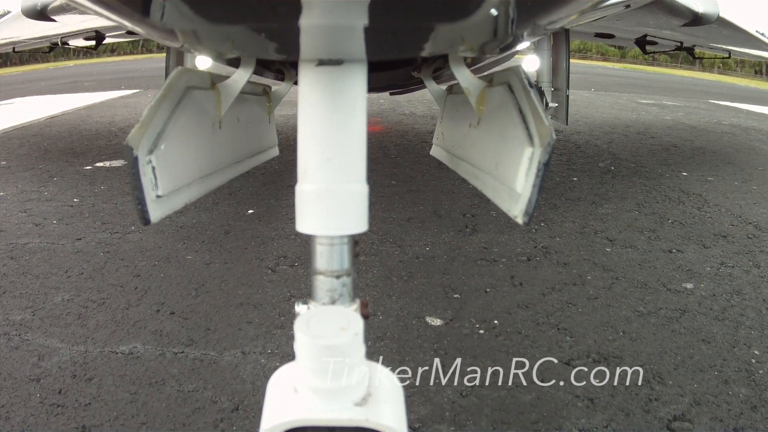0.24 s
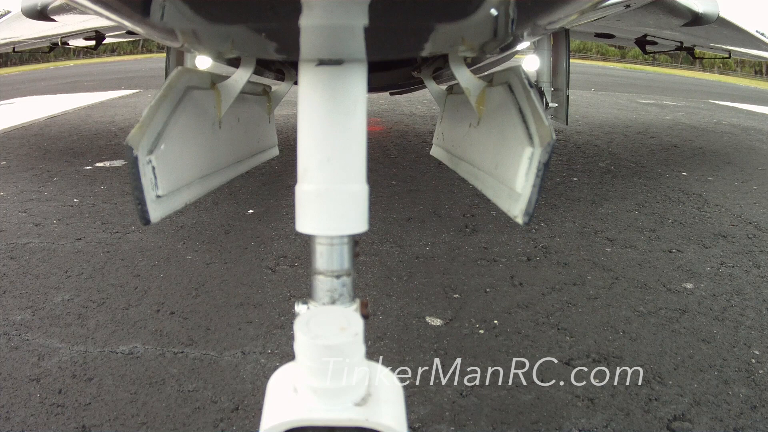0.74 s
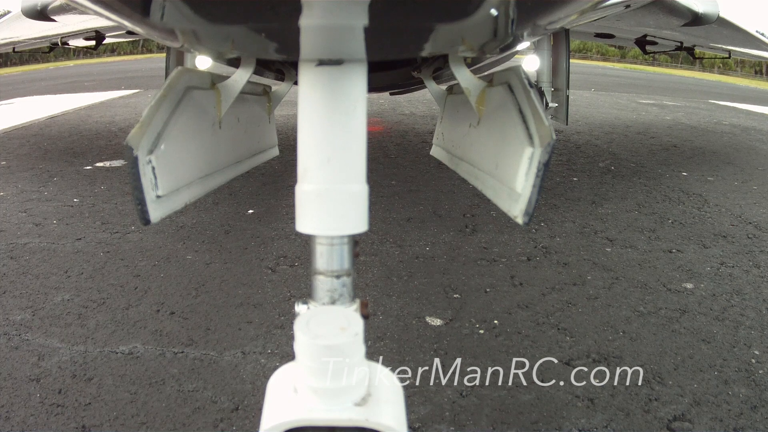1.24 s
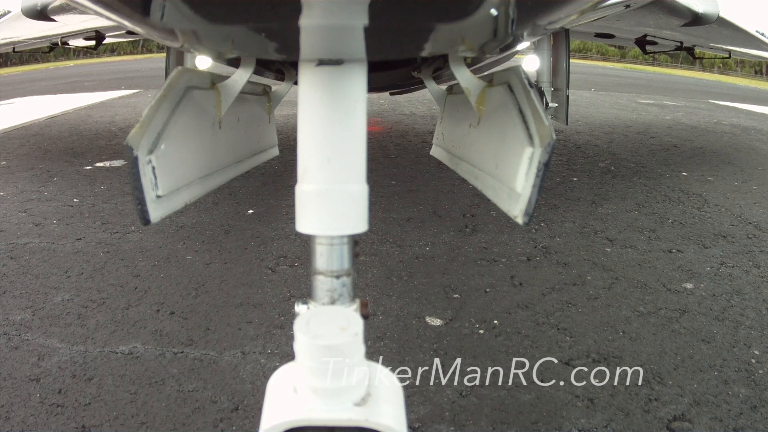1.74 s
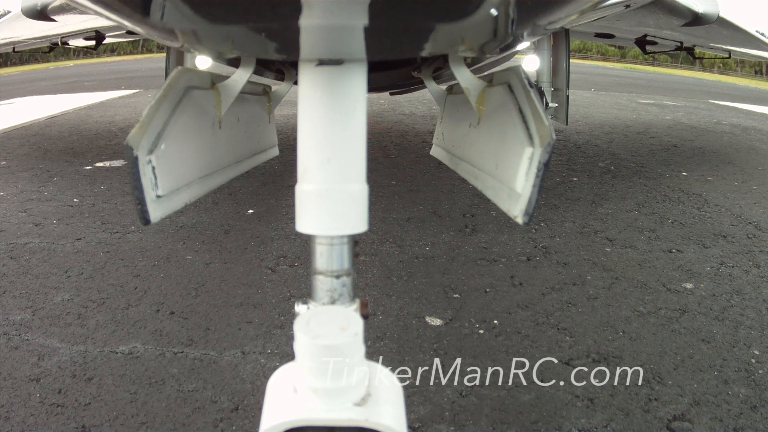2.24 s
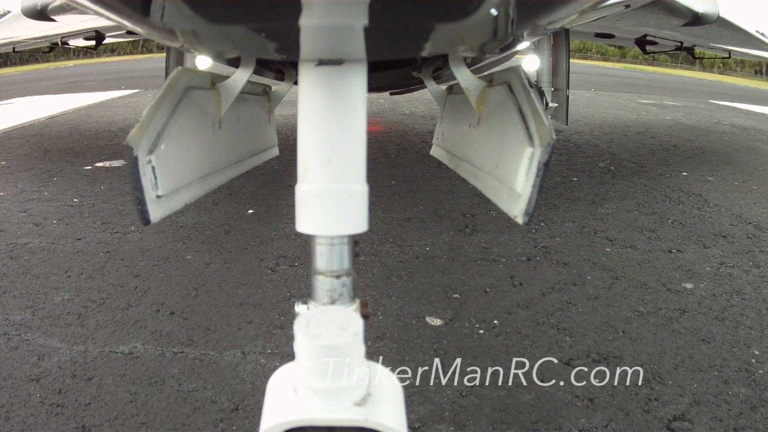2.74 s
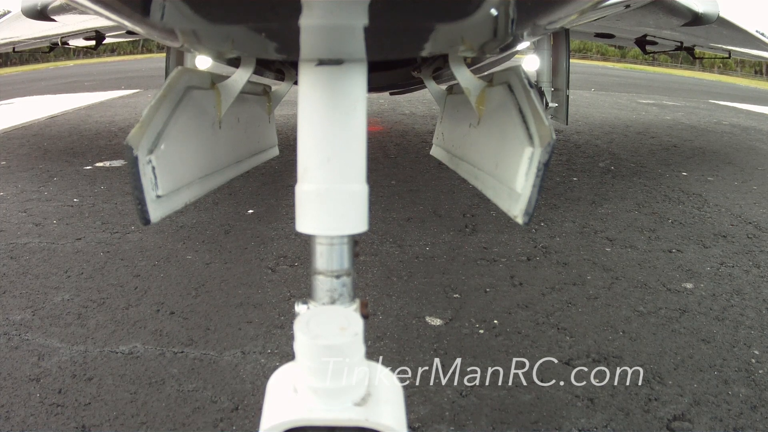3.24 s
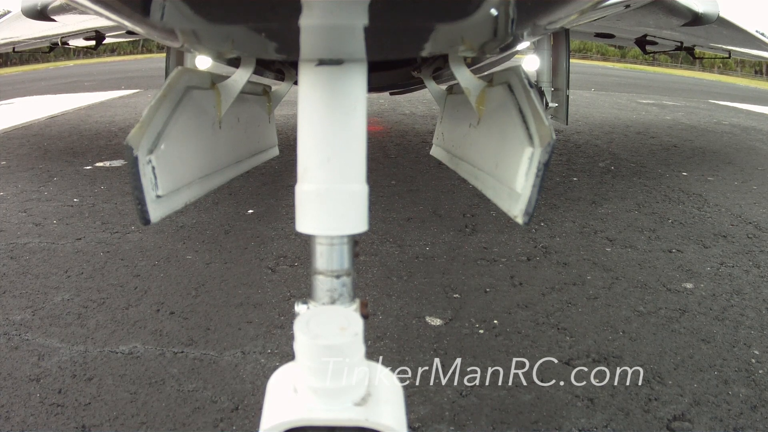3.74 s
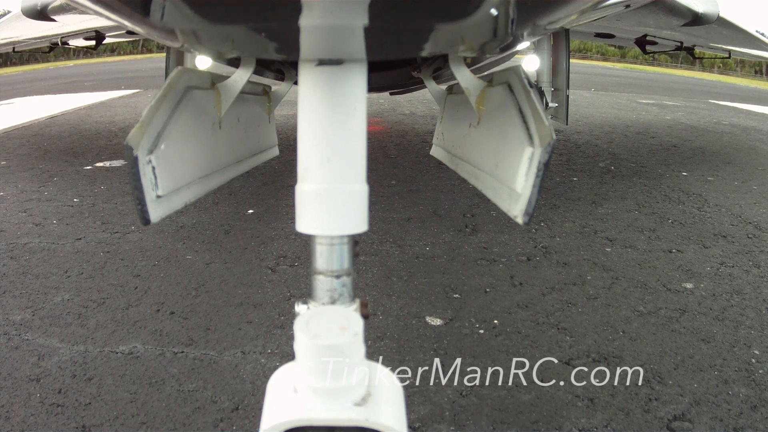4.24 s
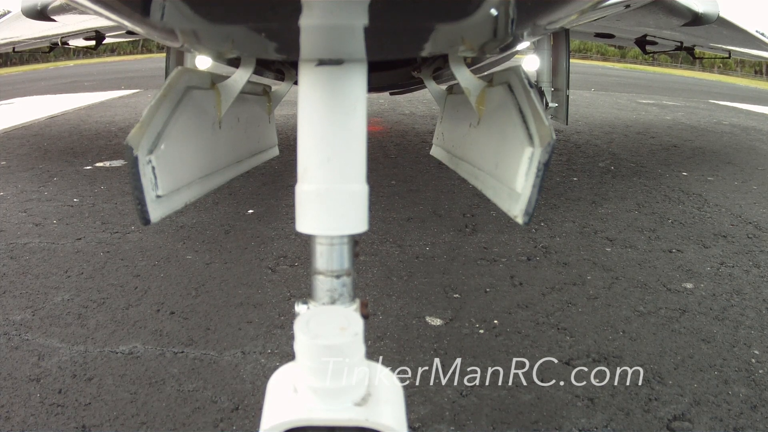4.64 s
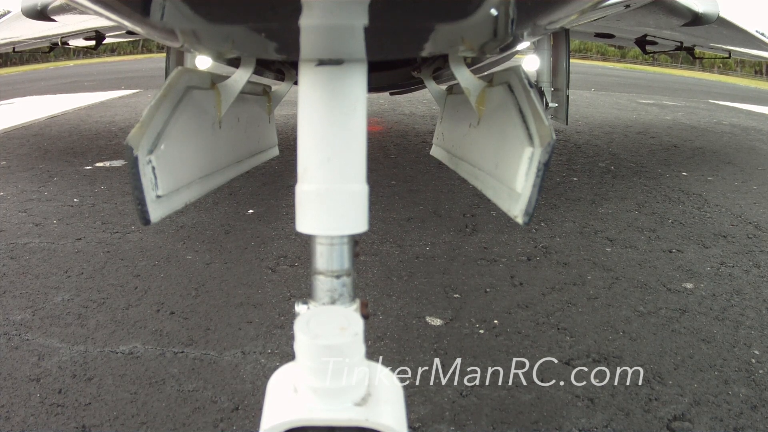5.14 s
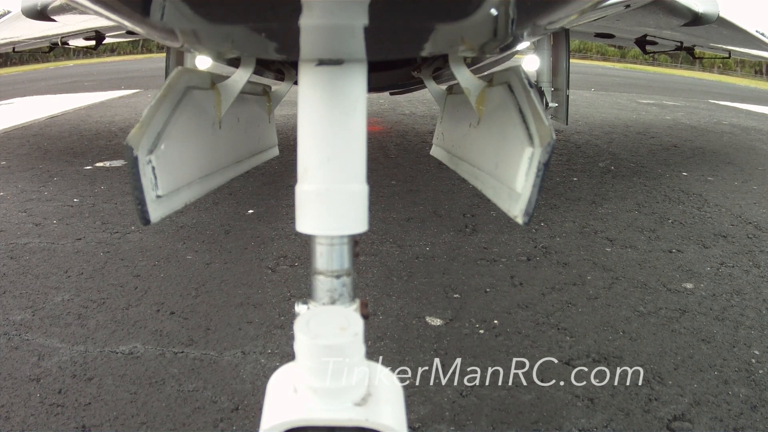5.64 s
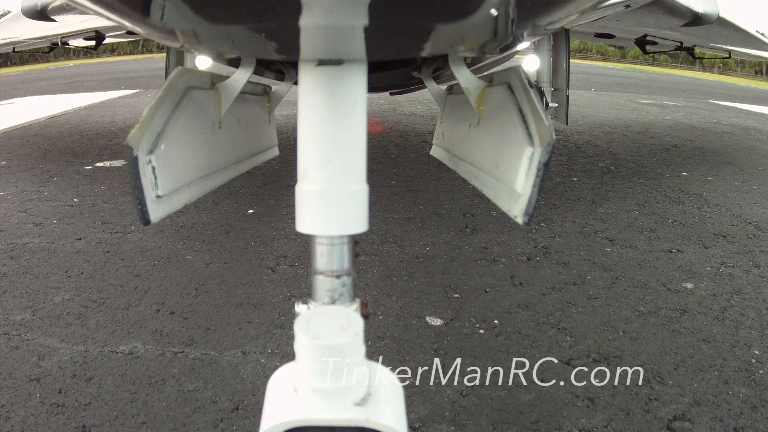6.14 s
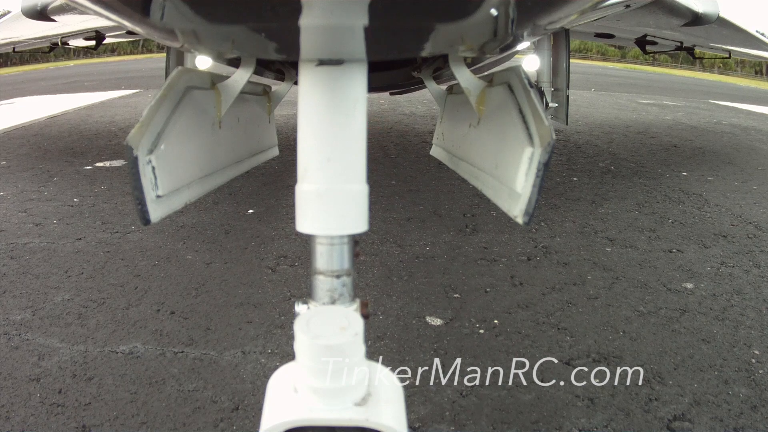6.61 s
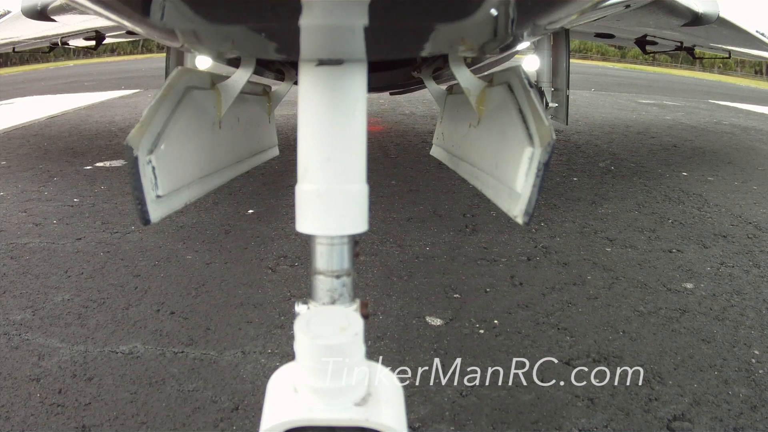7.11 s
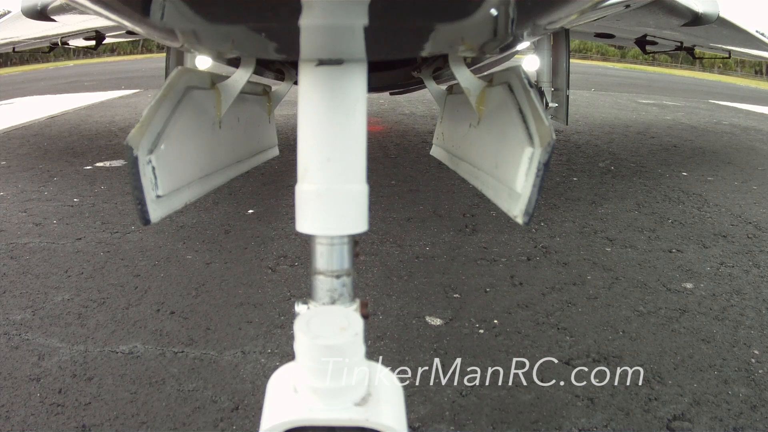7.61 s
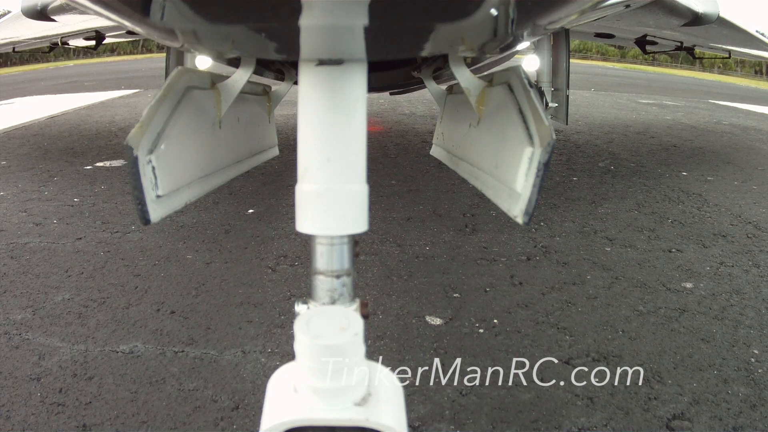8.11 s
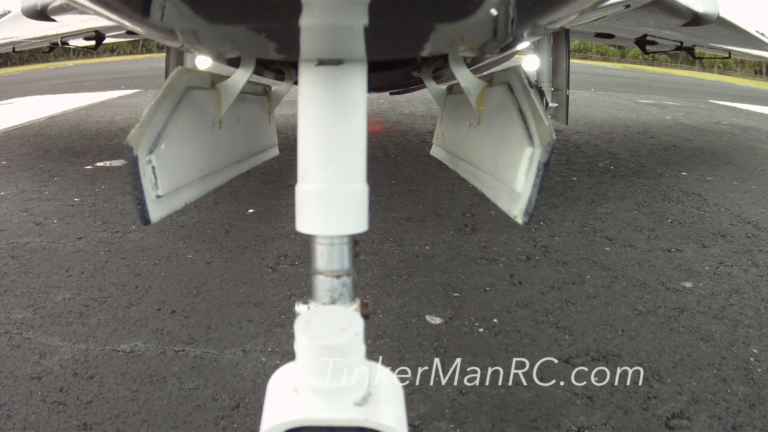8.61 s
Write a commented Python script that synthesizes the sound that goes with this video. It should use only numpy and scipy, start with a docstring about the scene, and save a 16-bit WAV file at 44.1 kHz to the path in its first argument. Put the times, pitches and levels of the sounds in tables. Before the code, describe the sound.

A small jet turbine idles on an outdoor runway, heard from right beneath the belly. A dense, steady rush of exhaust and hiss carries a thin high whine that slowly wavers in pitch. Around seven seconds it begins to spool up: the whine climbs smoothly and grows piercing, with brief chirps, while the broad rush thins out. It ends still rising. Mono, close, dry.

```python
"""Model jet idling, then spooling up

A model jet idles on the runway, heard by a small camera under its belly, and spools up from about 7 s.
The exhaust is noise rushing through fixed resonances of the airframe and the gap above the tarmac.
The compressor whines on multiples of the shaft speed, which hunts slowly at idle and then climbs.
Single overtones flare as brief chirps; the ultrasonic ones fold down in the camera's converter."""
import sys
import numpy as np
from scipy import signal
from scipy.fft import rfft, irfft, next_fast_len
from scipy.io import wavfile
from scipy.ndimage import uniform_filter1d

SR = 44100
rng = np.random.default_rng(int(sys.argv[2]) if len(sys.argv) > 2 else 0)


def put_to_file(sound):
    """Save the sound as 16-bit audio at rate SR, in the file named by the first command-line argument."""
    columns = np.atleast_2d(sound).T  # one column per channel
    safe = np.clip(columns, -1, 1)
    whole_steps = np.round(safe * 32767)
    wavfile.write(sys.argv[1], SR, whole_steps.astype(np.int16))


N = 391166
TIME = np.arange(N) / SR  # s


def gain_of(db):
    """Decibels to amplitude."""
    return 10 ** (np.asarray(db) / 20)


def read(points, hz):
    """A spectrum of rows (Hz, value), joined on a log-frequency axis."""
    f, value = np.transpose(points)
    return np.interp(np.log(hz + 1), np.log(f + 1), value)


def bell(x, centre, width):
    """A smooth hump of height 1; at one width from the centre it has dropped to 1/e."""
    return np.exp(-((x - centre) / width) ** 2)


def humps(rows, hz):
    """The dB curve of a table of resonances and cancellations."""
    return sum(db * bell(hz, centre, width) for centre, width, db in rows)


def drift(rate_hz):
    """Random motion of rms 1: noise whose spectrum fades out above about rate_hz."""
    size = 2 ** 19
    spectrum = rfft(rng.standard_normal(size))
    x = irfft(spectrum * bell(np.fft.rfftfreq(size, 1 / SR), 0, rate_hz))[:N]
    return x / x.std()


# At idle the governor hunts round its set speed and slowly settles (speeds in turns per second).
IDLE_SPEED, HUNT_SPEED = 775.7, 6.7
HUNT_PERIOD_S, HUNT_CREST_S, HUNT_SETTLE_S = 3.307, 2.02, 11.2
# The spool-up of the shaft, before inertia rounds it.
# Each row: time in seconds, shaft speed in turns per second.
SPOOL_UP_SPEEDS = [(6.85, 771.0), (7.02, 774.0), (7.235, 787.8), (7.497, 819.3), (7.782, 864.1),
                   (8.194, 937.8), (8.345, 962.1), (8.657, 1005.9), (8.87, 1029.1)]


def shaft_speed():
    """The shaft hunts at idle, then climbs; the rotor's inertia rounds every change of speed."""
    settling = np.exp(-TIME / HUNT_SETTLE_S)
    hunt = HUNT_SPEED * settling * np.cos(2 * np.pi * (TIME - HUNT_CREST_S) / HUNT_PERIOD_S)
    start_s, climb_speed = np.transpose(SPOOL_UP_SPEEDS)
    climb = np.interp(TIME, start_s, climb_speed)
    speed = np.where(TIME < start_s[0], IDLE_SPEED + hunt, climb)
    return uniform_filter1d(speed, size=5000, mode="nearest")  # running mean over 0.11 s


# The basic colour of the rush, before resonances and band trims.
# Each row: frequency in Hz, density in dB per Hz.
RUSH_COLOUR = [(25, -96.7), (80, -84), (120, -71.5), (300, -66), (430, -56), (750, -56.5), (1400, -66),
               (2300, -64.5), (4000, -68.5), (5400, -63), (7900, -79.5), (10700, -84.5), (11600, -70.5),
               (15000, -68.5)]
# Resonances (+) and cancellations (-) under the fuselage, always present.
# Each row: centre in Hz, half width in Hz, height in dB.
BODY_RESONANCES = [(118, 7.5, -2), (137, 7.8, 6), (159, 6.4, -5.5), (168, 6.2, 5.5), (204, 20, -5),
                   (236.5, 10.4, 5), (263, 10.5, -2.5), (448, 56, 6), (583, 61, 3.5), (636, 12, -3.5),
                   (780, 16, 3), (883, 56, -7), (1052, 87, 6), (1140, 18, -9), (1190, 27, 2.5),
                   (1377, 80, -3.5), (1467, 50, 4.5), (1980, 36, -5.5), (2033, 122, 5), (2281, 100, 6),
                   (2610, 100, 2.5), (3048, 48, -9), (3660, 67, -7), (3855, 120, 2.5), (4360, 79, -17),
                   (4860, 65, 5), (5306, 78, 4), (6690, 410, 3.5), (7560, 54, 4.5), (9600, 390, -3.5)]
# Resonances (+) and cancellations (-) that come in as the throttle opens.
# Each row: centre in Hz, half width in Hz, height in dB at open throttle.
THRUST_RESONANCES = [(1920, 57, 6), (1240, 50, 1.5), (920, 54, 3), (660, 40, 0.5), (780, 38, -2.5),
                     (3330, 720, 1.5), (4720, 310, -4.5), (6840, 790, -1.5), (8100, 500, 3.5)]
# Band trims for exhaust roar, rush, intake hiss and fizz.
# Each row: centre in Hz, trim in dB, gain in dB as the throttle opens, loss in dB at high speed.
AIR_BANDS = [(650, 0.1, 0.66, 6), (2410, 0.27, 0.3, 6), (5400, 0, -1, 5.6), (13000, -0.2, 0.2, 4.5)]
QUIET_SPEED, QUIET_SPREAD = 890, 12.5  # the rush falls away round this shaft speed (turns per second)


def rush(speed, flicker_db=0.43, wander_db=0.14, patch_db=0.32, blade_db=2.5, blade_width_hz=650,
         open_speed=25):
    """Turbulent air, coloured by the airframe, with a hump of hiss that rides above the blade tone."""
    hz, t, noise = signal.stft(rng.standard_normal(N), SR, nperseg=4096, noverlap=3072)
    hz = hz[:, None]
    turning = np.interp(t, TIME, speed)
    idle = np.median(speed)
    # the throttle counts as open once the shaft is open_speed turns per second above idle
    throttle = np.clip((turning - idle) / open_speed, 0, 1)
    colour_db = read(RUSH_COLOUR, hz) + humps(BODY_RESONANCES, hz)
    colour_db = colour_db + throttle * humps(THRUST_RESONANCES, hz)

    # eddies chopped by the blades follow the shaft up from their place at idle
    eddy_order = 6.4
    eddies_now = bell(hz, eddy_order * turning, blade_width_hz)
    eddies_at_idle = bell(hz, eddy_order * idle, blade_width_hz)
    colour_db += blade_db * (eddies_now - eddies_at_idle)

    # the bands shift with the throttle, then all fall away at high speed
    centre_hz, *columns = np.transpose(AIR_BANDS)
    trim_db, surge_db, loss_db = (read(np.c_[centre_hz, column], hz) for column in columns)
    quiet = 1 / (1 + np.exp((QUIET_SPEED - turning) / QUIET_SPREAD))
    colour_db += trim_db + throttle * surge_db - quiet * loss_db

    # random patches of the spectrum swell and fade
    patches = uniform_filter1d(rng.standard_normal(noise.shape), size=60, axis=0)
    patches = uniform_filter1d(patches, size=3, axis=1)
    colour_db += patch_db * patches / patches.std()

    air = signal.istft(noise * gain_of(colour_db), nperseg=4096, noverlap=3072)[1][:N]
    air *= np.sqrt(SR / 2)  # from density per Hz to amplitude
    return air * gain_of(flicker_db * drift(40) + wander_db * drift(4.6))


BLADES = 6
# Strength of any blade tone at the pitch it has reached.
# Each row: frequency in Hz, level in dB before the duct.
WHINE_LEVELS = [(4600, -42), (5300, -45.5), (5550, -52), (6200, -45), (9230, -62.5), (9400, -47),
                (11000, -45), (11300, -28.5), (12400, -18.5), (14050, -48.5), (14160, -41), (15300, -33)]
# Resonances (+) and cancellations (-) that the blade tones sweep through.
# Each row: centre in Hz, half width in Hz, height in dB.
DUCT_RESONANCES = [(5250, 110, 6), (9530, 54, 5), (9800, 82, -3), (10240, 130, 9), (10580, 70, 9),
                   (11510, 52, -12), (11730, 61, -2), (12050, 150, -6), (13870, 100, 7), (14800, 200, 5)]
# Faint tones of unbalance and unequal blades.
# Each row: shaft order in cycles per turn, level in dB at idle, level in dB at speed.
SHAFT_ORDERS = [(1, -48.5, -52), (2, -55, -67), (5, -48.5, -78), (7, -54.5, -74), (13, -74, -52),
                (14, -75, -57), (15, -55, -56)]


def whine(speed, turns, shimmer_db=2.1, steady_db=0.8, flutter=0.18, scatter=0.18, scatter_hz=70, count=3):
    """Blade-passing harmonics, which turbulence shakes less at speed, and weak fluttering shaft orders."""
    out = np.zeros(N)
    spool = (speed - speed.min()) / np.ptp(speed)  # 0 at the slowest, 1 at the fastest
    waver_db = shimmer_db + spool * (steady_db - shimmer_db)
    for k in range(1, count + 1):
        hz = k * BLADES * speed
        level_db = read(WHINE_LEVELS, hz) + humps(DUCT_RESONANCES, hz)
        angle = 2 * np.pi * k * BLADES * turns
        # at idle, eddies in the intake scatter part of each tone into a fuzzy skirt
        fuzz = (drift(scatter_hz) * np.sin(angle) + drift(scatter_hz) * np.cos(angle)) / np.sqrt(2)
        fuzz *= scatter * (1 - spool) ** 3
        tone = np.sin(angle + 0.054 * drift(60))  # phase jitter in radians
        out += gain_of(level_db + waver_db * drift(25)) * (tone + fuzz)
    for order, idle_db, fast_db in SHAFT_ORDERS:
        tone = np.cos(2 * np.pi * order * turns)
        out += gain_of(idle_db + spool * (fast_db - idle_db)) * (1 + flutter * drift(15)) * tone
    return np.sqrt(2) * out  # levels are those of the rms


CONVERTER_HZ = 48000
# Single overtones that flare briefly during the spool-up.
# Each row: centre in seconds, half length in seconds, shaft order in cycles per turn, peak level in dB.
OVERTONE_FLARES = [(7.69, .08, 13, -49), (8.113, 0.032, 54, -33.5), (8.147, 0.024, 48, -42),
                   (8.33, .12, 15, -47), (8.42, .06, 13, -48), (8.59, .1, 15, -44), (8.63, .04, 13, -39),
                   (8.85, .08, 36, -46), (8.86, .05, 60, -48)]


def flares(speed, turns):
    """Ultrasonic overtones sound at their distance from the converter's rate; lower ones sound as they are."""
    out = np.zeros(N)
    for s, length, order, db in OVERTONE_FLARES:
        folds = round(order * np.interp(s, TIME, speed) / CONVERTER_HZ)  # 0 when it needs no folding
        tone = np.sin(2 * np.pi * (order * turns - folds * CONVERTER_HZ * TIME))
        out += gain_of(db) * bell(TIME, s, length) * tone
    return np.sqrt(2) * out


# Brief swells (+) and dips (-) of the rush and whine together.
# Each row: centre in seconds, half length in seconds, change in dB.
LEVEL_SWELLS = [(0.98, .12, -1), (3.6, .3, -0.9), (4.42, .18, -1), (7.405, .07, 1.7), (7.76, 0.047, 2),
                (8.12, 0.033, -8), (8.2, 0.068, -2), (8.826, 0.04, -3.5)]


def swell_db():
    """The brief swells and dips of level as one dB curve."""
    return sum(db * bell(TIME, s, length) for s, length, db in LEVEL_SWELLS)


def scene():
    """One shaft drives everything; both channels carry the same mono sound."""
    speed = shaft_speed()
    turns = np.cumsum(speed + 0.164 * drift(12)) / SR  # with a slight unsteadiness
    engine = (rush(speed) + whine(speed, turns)) * gain_of(swell_db())
    engine += flares(speed, turns)
    return np.array([engine, engine])


NOTCH_HZ, EDGE_HZ = 9000, 15300


def record(dry, notch_width_hz=260, skirt_db=-10, skirt_hz=8750, skirt_width_hz=480):
    """The camera has a deep notch with wide skirts in the treble, and a steep band limit."""
    size = next_fast_len(N + 4096)
    hz = np.fft.rfftfreq(size, 1 / SR)
    notch = 1 - np.exp(-((hz - NOTCH_HZ) / notch_width_hz) ** 4)
    skirt = gain_of(skirt_db * bell(hz, skirt_hz, skirt_width_hz))
    edge = np.clip((EDGE_HZ - hz) / 80 + .5, 0, 1)  # closes within 80 Hz
    return irfft(rfft(dry, size) * notch * skirt * edge, size)[:, :N]


dry = scene()
out = record(dry)
put_to_file(out)
```